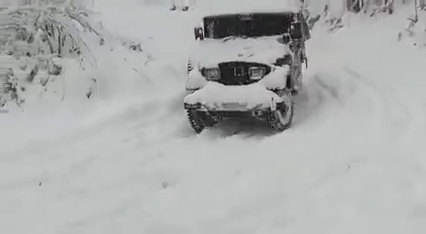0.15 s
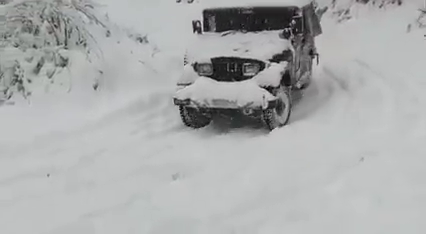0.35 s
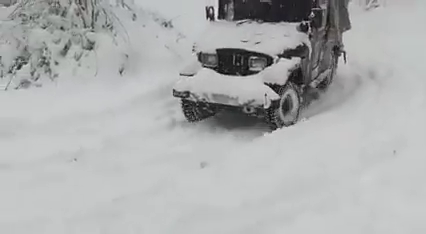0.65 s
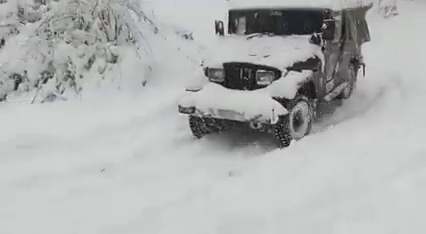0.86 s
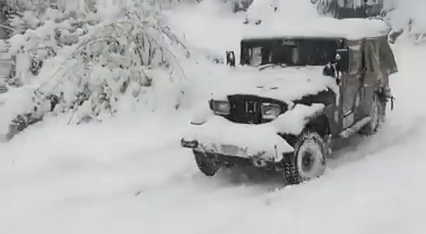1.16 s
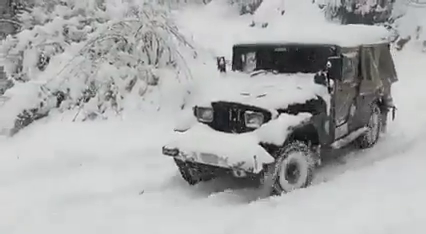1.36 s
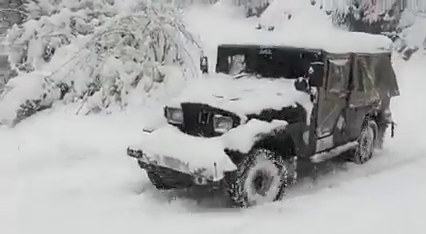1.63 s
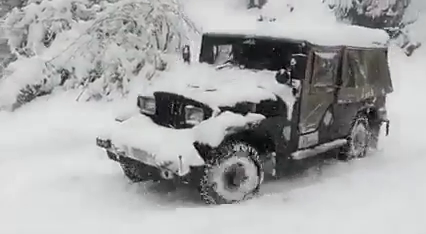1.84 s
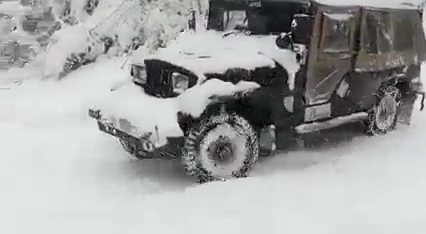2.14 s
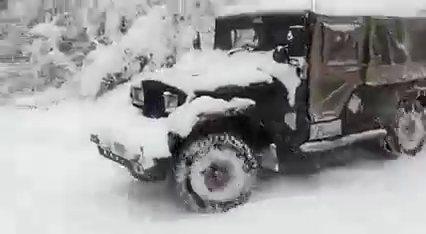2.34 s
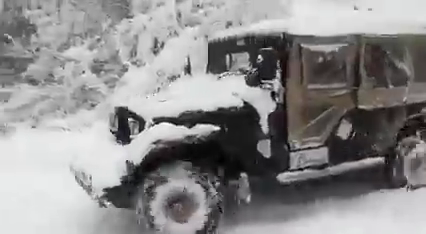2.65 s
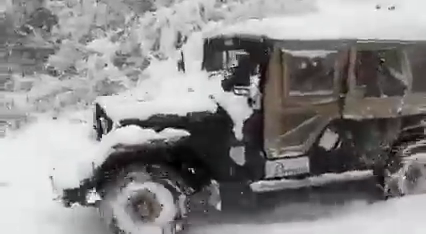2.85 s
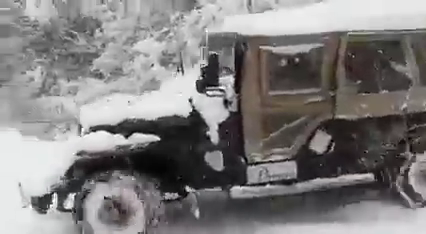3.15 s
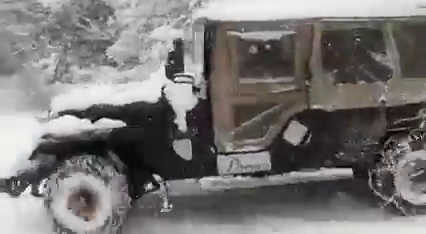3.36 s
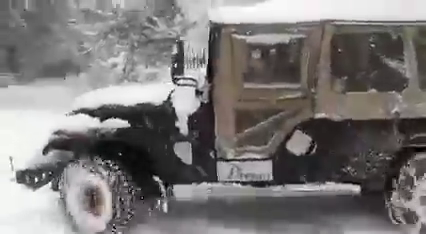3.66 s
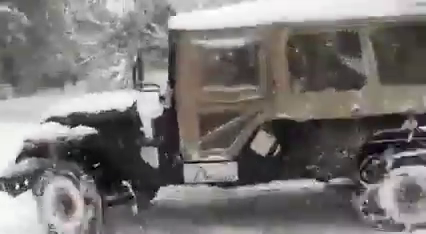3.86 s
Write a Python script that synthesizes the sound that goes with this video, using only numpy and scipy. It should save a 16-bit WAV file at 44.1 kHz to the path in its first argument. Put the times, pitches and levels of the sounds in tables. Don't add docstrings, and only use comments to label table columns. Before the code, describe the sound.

A heavy truck engine starts as a faint low drone outdoors in snow, then swells to a roar as it nears the fixed-position microphone, with crunching snow, clinking tyre chains and rattling panels.

```python
import sys
import numpy as np
from scipy import signal
from scipy.io import wavfile
from scipy.ndimage import uniform_filter1d

SR = 44100
rng = np.random.default_rng(int(sys.argv[2]) if len(sys.argv) > 2 else 0)


def to_wav(s):
    ch = np.atleast_2d(s).T
    pcm = np.round(np.clip(ch, -1, 1) * 32767)
    wavfile.write(sys.argv[1], SR, pcm.astype(np.int16))


def magnitude_from_level(level_db):
    exponent = np.asarray(level_db, float) / 20
    return 10 ** exponent


N = 176400

# (time [s], firing rate [Hz], first order level [dB], second order level [dB])
ENGINE = [(0.0, 46.09, -60.7, -54.5), (0.4, 47.26, -59.9, -56.7), (0.8, 47.89, -62.6, -54.4),
          (1.12, 48.38, -61.5, -53.1), (1.4, 52.22, -53.4, -52.0), (1.6, 53.64, -48.7, -48.0),
          (1.95, 54.75, -48.9, -47.3), (2.2, 56.93, -47.2, -44.7), (2.55, 55.63, -49.5, -44.2),
          (2.9, 59.47, -44.5, -42.8), (3.15, 59.35, -41.6, -41.5), (3.4, 59.3, -40.1, -41.1),
          (3.6, 61.27, -38.3, -40.7), (3.75, 64.92, -33.7, -36.7), (3.88, 65.66, -30.8, -35.3),
          (4.0, 62.5, -33.8, -38.6)]
# (time [s], level [dB])
NEAR = [(0, -62), (1.1, -62.5), (1.6, -59), (3.2, -57.5), (4, -56)]


def evened(x):
    return x / np.sqrt(np.mean(x ** 2) + 1e-20)


def read(points, hz):
    f, value = np.transpose(points)
    return np.interp(np.log(hz + 1), np.log(f + 1), value)


def along(points, column=1, t=None):
    rows = np.array(points, float)
    return np.interp(np.arange(N) / SR if t is None else t, rows[:, 0], rows[:, column])


def add(mix, start_s, sound):
    part = mix[round(start_s * SR):][:len(sound)]
    part += sound[:len(part)]


def drift(per_s):
    t = np.arange(0, N, 64) / SR
    rates_hz = np.geomspace(per_s / 12, per_s, 16)
    slow = sum(np.sin(2 * np.pi * (f * t + rng.random())) / np.sqrt(f) for f in rates_hz)
    return np.interp(np.arange(N) / SR, t, evened(slow))


def resonate(x, hz, width_hz):
    turn = np.exp(2j * np.pi * hz * np.arange(len(x)) / SR)
    r = np.exp(-np.pi * width_hz / SR)
    return 2 * (turn * signal.lfilter([1 - r], [1, -r], x / turn)).real


def noise(spectrum, patch_db, flicker_db, tilt_db=0., thin_db=0., count=8):
    frames, hz = N // 256 + 5, np.fft.rfftfreq(1024, 1 / SR)[:, None]
    a, b, patches = rng.standard_normal((frames, 513, 3)).T
    patches = uniform_filter1d(patches, size=count, axis=0)
    patches = evened(uniform_filter1d(patches, size=12, axis=1))
    flicker = evened(uniform_filter1d(rng.standard_normal(frames), size=5))
    field_db = read(spectrum, hz) + patch_db * patches
    field_db = field_db + (flicker_db * flicker + tilt_db) * np.log2(1 + hz / 1000)
    field_db = field_db + thin_db * (hz < 260)
    inside = hz >= .6 * spectrum[0][0]
    return evened(signal.istft((a + 1j * b) * magnitude_from_level(field_db) * inside, nperseg=1024, noverlap=768)[1][:N])


def hiss():
    # (frequency [Hz], density [dB per Hz])
    air = [(10800, -26), (11300, -0.5), (12200, 3), (14000, 7), (15600, -2.5)]
    # (time [s], level [dB])
    swell = [(0, -104), (1.38, -104), (1.45, -95), (2.15, -87.5), (2.23, -94.5), (2.3, -85.5), (2.9, -86),
             (2.94, -83.5), (3.22, -84), (3.3, -80), (4, -83.5)]
    step_s, step_db, mic_db = .04, 2.3, -92
    steps = np.repeat(rng.standard_normal(400), round(step_s * SR))[:N]
    level_db = along(swell) + step_db * uniform_filter1d(steps, size=200)
    floor = magnitude_from_level(mic_db) * rng.standard_normal(N)
    return magnitude_from_level(level_db) * noise(air, 2.2, 0.087) + floor


def rattles(turns):
    # (start [s], length [s], panel resonance [Hz], level [dB])
    bursts = [(0.028, 0.15, 1606, -61.5), (0.905, 0.24, 1354, -55), (1.09, 0.3, 1342, -55),
              (1.038, .32, 1996, -60.5), (1.585, 0.13, 1970, -57.5), (1.613, 0.18, 1430, -59.5),
              (1.83, 0.053, 2030, -59), (2.007, 0.13, 2990, -63), (2.172, 0.15, 3497, -63),
              (2.39, .1, 3400, -68.5), (3.175, 0.11, 856, -56), (3.194, 0.09, 1410, -54.5),
              (3.36, .16, 875, -50), (3.38, 0.038, 2013, -53), (3.422, 0.17, 1325, -54),
              (3.527, 0.079, 1966, -62), (3.617, 0.099, 1340, -50.5), (3.69, 0.15, 1390, -46),
              (3.775, 0.089, 695, -51.5), (3.834, 0.028, 1980, -48), (3.836, 0.061, 1285, -51),
              (3.6, 0.048, 1323, -52.5), (3.42, 0.24, 3740, -65), (3.63, .25, 3430, -62),
              (3.52, .2, 2960, -65), (1.74, 0.056, 4930, -74), (1.67, 0.061, 5520, -75),
              (1.4, .1, 5080, -79), (1.16, 0.24, 2900, -71.5), (1.43, 0.12, 2950, -68),
              (2.79, .08, 5220, -73), (2.98, 0.1, 5000, -73), (3.14, .17, 5100, -72),
              (3.66, .12, 5020, -68.5), (3.42, 0.095, 4170, -68), (.45, .15, 1500, -63.5),
              (.73, 0.078, 1650, -60), (3.73, .1, 1500, -50.5), (0.308, 0.068, 2680, -68.5),
              (.31, .07, 2100, -68), (.8, .08, 2680, -71), (2.39, 0.14, 2300, -65.5),
              (2.66, 0.094, 1350, -59), (2.53, 0.054, 3650, -64), (2.76, 0.046, 3680, -65),
              (2.99, 0.08, 2000, -62), (1.28, .1, 4400, -77), (2.97, 0.13, 630, -56),
              (3.433, 0.26, 576, -59), (1.16, 0.025, 1370, -49.5)]
    width_hz, wide_above_hz, throb = 82, 2600, .65
    steady = .35
    out = np.zeros(N)
    gate = 1 + throb * np.cos(2 * np.pi * turns + 0.52 * drift(20))
    shake = gate * rng.standard_normal(N)
    for start_s, length_s, hz, db in bursts:
        part = shake[round(start_s * SR):][:round(length_s * SR)]
        panel_width_hz = width_hz * max(1, hz / wide_above_hz)
        ring = resonate(resonate(part, hz, panel_width_hz), hz, panel_width_hz)
        ring = ring / (abs(signal.hilbert(ring)) + 1e-9) ** steady
        swell = np.sin(np.linspace(0, np.pi, len(part))) ** 0.71
        add(out, start_s, magnitude_from_level(db) * evened(ring) * swell)
    return out


def decay(t60_s, attack_s):
    t = np.arange(6000) / SR
    return magnitude_from_level(-60 * t / t60_s) * np.minimum(t / attack_s, 1)


def struck(hz, t60_s, spread):
    t = np.arange(6000) / SR
    modes = rng.uniform(-0.923, 1, (3, 2))
    trio = sum(np.sin(2 * np.pi * (hz * (1 + spread * d) * t + p)) for d, p in modes)
    return trio * decay(t60_s, 0.0037) / 2


def chains():
    # (time [s], peak level [dB], ring [Hz], ring level re peak [dB])
    clinks = [(0.0836, -55, 3110, -9), (0.3182, -59, 2700, -11), (0.825, -57, 2660, -11),
              (0.8884, -56, 2540, -11), (0.9911, -61, 2980, -9.5), (1.18, -55, 3150, -8),
              (1.279, -56.5, 2850, -9), (1.4351, -57, 3030, -10), (1.4706, -53, 2790, -9),
              (1.5264, -57, 2990, -8), (1.6008, -56.5, 2740, -8), (1.6748, -48, 2940, -9.5),
              (1.7489, -54, 4930, -10), (1.859, -49, 4140, -8), (1.9001, -55.5, 3660, -10),
              (1.9689, -51.5, 2760, -9), (2.0258, -49, 2980, -8), (2.0798, -50.5, 2950, -10),
              (2.1116, -50.5, 3410, -9), (2.2009, -53, 3420, -9), (2.2553, -43.5, 3483, -9),
              (2.3426, -53, 2770, -9), (2.396, -50, 3650, -8.5), (2.5376, -49, 2940, -8),
              (2.609, -57, 3020, -9), (2.6618, -47.5, 2910, -9), (2.7681, -48.5, 3420, -8),
              (2.8868, -53, 3070, -9.5), (2.9701, -55, 3140, -9), (3.0001, -56, 5000, -11),
              (3.0669, -53, 3700, -9), (3.1867, -53, 2920, -10), (3.2236, -50.5, 3660, -9),
              (3.255, -52, 3680, -10), (3.4201, -47, 3430, -6), (3.47, -48.5, 3020, -10),
              (3.5039, -49, 3800, -8), (3.5728, -46.5, 2960, -8.5), (3.6024, -48.5, 2870, -9),
              (3.6378, -44, 3020, -9.5), (3.686, -48.5, 3470, -9), (3.7329, -42.5, 3010, -8),
              (3.8388, -43.5, 3080, -9), (3.899, -55, 2530, -9), (3.9464, -55, 2560, -10)]
    # (time [s], peak level [dB])
    knocks = [(0.0697, -49), (0.319, -39.5), (0.405, -44), (0.48, -42), (0.57, -47), (0.68, -45),
              (0.7444, -41.5), (0.823, -42), (0.8847, -41), (1.175, -41), (1.5459, -45), (1.6732, -34),
              (2.115, -39), (2.9174, -36.5), (3.237, -43), (3.3575, -39), (3.62, -37), (3.933, -36)]
    # (frequency [Hz], density [dB per Hz])
    link = [(760, -25), (1300, -6), (2640, -14.5), (3520, -15), (5100, -25), (6000, -34.5), (8000, -56),
            (10400, -101.5)]
    # (frequency [Hz], density [dB per Hz])
    crunch = [(700, -5), (1400, 19), (2700, 6.5), (4000, -28.5), (8000, -80.5)]
    clink_t60_s, scrape_db, knock_db = 0.13, -8, -14.5
    jingle_per_s, jingle_db = 80, -9
    scrape_decay, knock_decay = decay(0.15, 0.005), decay(0.094, 0.004)

    rings, scrape_gain, crunch_gain = np.zeros(N), np.zeros(N), np.zeros(N)
    for s, db, hz, ring_db in clinks:
        add(rings, s, magnitude_from_level(db + ring_db + 2.0) * struck(hz, clink_t60_s, 0.02))
        add(scrape_gain, s, magnitude_from_level(db + scrape_db) * scrape_decay)
    for s, db in knocks:
        add(crunch_gain, s, magnitude_from_level(db + knock_db) * knock_decay)
    scrapes = scrape_gain * noise(link, 4, 0.44, count=5)
    crunches = crunch_gain * noise(crunch, 4.0, 0.8)

    hits = magnitude_from_level(4.0 * np.minimum(rng.exponential(1, N), 2)) * (rng.random(N) < jingle_per_s / SR)
    loose = signal.oaconvolve(hits, decay(0.15, .004))[:N]
    jingle = evened(loose * noise(link, 3, 0.15, count=4))
    return rings + scrapes + crunches + magnitude_from_level(along(NEAR) + jingle_db) * jingle


def roar(turns):
    # (frequency [Hz], density [dB per Hz])
    body_spectrum = [(120, -30), (200, -2), (443, -2.5), (812, -3.5), (1120, -6), (3570, -19.5),
                     (5200, -26), (6200, -35), (9000, -49), (11700, -87)]
    # (frequency [Hz], density [dB per Hz])
    rumble_spectrum = [(15, -14), (40, -7), (120, 16.5), (250, -16.5), (400, -46)]
    roar_db, patch_db, flicker_db, throb = 1.5, 1.27, 0.56, 0.15
    dull_per_db, thin_per_db = -0.5247, -0.68
    rumble_db, rumble_share = -61, .5
    near_db = along(NEAR)
    far_db = near_db.max() - along(NEAR, t=np.arange(N // 256 + 5) * 256 / SR)
    body = noise(body_spectrum, patch_db, flicker_db, dull_per_db * far_db, thin_per_db * far_db)
    body = body * (1 + throb * np.cos(2 * np.pi * turns))
    rumble_gain = magnitude_from_level(rumble_db + rumble_share * (along(ENGINE, column=3) + 45))
    return magnitude_from_level(near_db + roar_db) * body, rumble_gain * noise(rumble_spectrum, 1.5, 0)


def snow_echo(x):
    # (centre [Hz], width [Hz], depth [dB])
    dips = [(465, 65, -12), (1120, 80, -11), (1770, 70, -10), (2640, 105, -9), (3330, 110, -8),
            (4050, 110, -9), (4720, 120, -9), (5400, 100, -8), (5950, 100, -5)]
    # (time [s], frequency stretch [ratio])
    dip_shift = [(0, 1.1), (.8, 1.1), (1.05, 1), (2, .985), (4, .98)]
    hz, t, z = signal.stft(x, SR, nperseg=1024, noverlap=768)
    shift = along(dip_shift, t=t)
    gain_db = 4.0
    for k, (f, width_hz, db) in enumerate(dips):
        centre_hz = f * (shift if k else np.ones_like(t))
        gain_db = gain_db + db * np.exp(-.5 * ((hz[:, None] - centre_hz) / width_hz) ** 2)
    return signal.istft(z * magnitude_from_level(gain_db), SR, nperseg=1024, noverlap=768)[1][:N]


def exhaust(turns):
    # (frequency [Hz], level re nearness [dB])
    pipe = [(140, -8.5), (165, -9.5), (180, -2.5), (193, 1), (225, -6), (268, -6), (300, -16), (450, -21.5)]
    # (time [s], boost [dB])
    surges = [(.33, 2.5), (.52, 2.5), (.97, 6.5), (1.29, 7.5), (1.5, 4), (2.3, 1.5)]
    # (time [s], image level [dB])
    mirror = [(0, -71), (.8, -76), (1.4, -59), (3.3, -62), (3.9, -56)]
    # (firing multiple, block multiple, phase [rad], level re mirror [dB], loss after 2 s [dB per s])
    images = [(-1, 1, 1.5, 0, 0), (2, -1, -1.4, -7, 0), (3, -1, -2.4, -3, 8), (0, 1, -1.8, -3, 5)]
    block_hz, surge_s = 100, 0.044
    low_wobble_db, upper_wobble_db = .4, 3.0
    half_db, fourth_db = -28.5, -13.5
    hz, t = along(ENGINE, column=1), np.arange(N) / SR
    phase = 2 * np.pi * turns

    surge_db = sum(db * np.exp(-.5 * ((t - s) / surge_s) ** 2) for s, db in surges)
    first = magnitude_from_level(along(ENGINE, column=2) + surge_db + low_wobble_db * drift(14))
    second = magnitude_from_level(along(ENGINE, column=3) + 0.46 * surge_db + 2 * low_wobble_db * drift(20))
    out = first * np.cos(phase + np.linspace(3.4, 2.35, N)) + second * np.cos(2 * phase - .8)
    for k in range(3, 8):
        level_db = along(NEAR) + read(pipe, k * hz) + fourth_db * (k == 4) + upper_wobble_db * drift(14)
        out += magnitude_from_level(level_db) * np.cos(k * phase + 1.23 * drift(9))
    for k in range(1, 6, 2):
        out += second * magnitude_from_level(half_db + upper_wobble_db * drift(6.6)) * np.cos(k / 2 * phase + .7)
    for k, m, rad, db, fade_db_per_s in images:
        level_db = along(mirror) + db - fade_db_per_s * np.maximum(t - 2, 0)
        out += magnitude_from_level(level_db) * np.cos(k * phase + 2 * np.pi * m * block_hz * t + rad)
    return np.sqrt(2) * out


def scene():
    turns = np.cumsum(along(ENGINE, column=1)) / SR
    body, rumble = roar(turns)
    echoed = snow_echo(body + chains())
    return (hiss() + rattles(turns) + echoed + rumble + exhaust(turns))[None]


def top_cut(x):
    return signal.sosfilt(signal.butter(12, 15690, fs=SR, output="sos"), x)


def record(dry):
    taps = signal.firwin(511, 15700, window=("kaiser", 9), fs=SR)
    mix = signal.oaconvolve(dry, taps[None], "same")
    return top_cut(mix)


dry = scene()
out = record(dry)
to_wav(out)
```